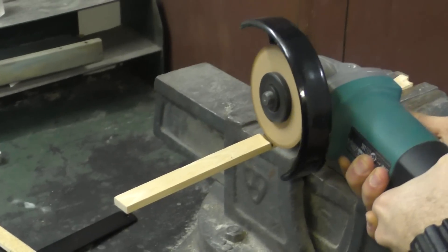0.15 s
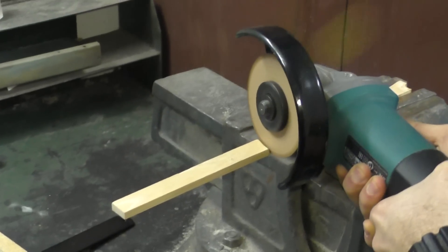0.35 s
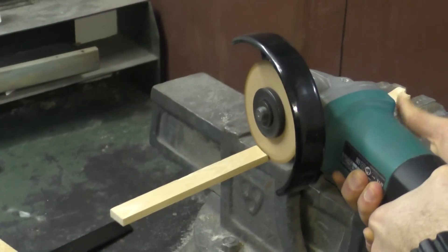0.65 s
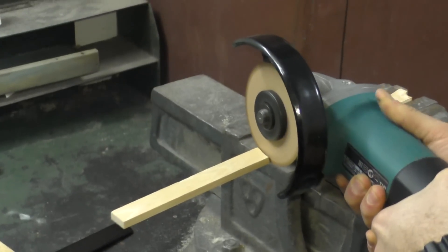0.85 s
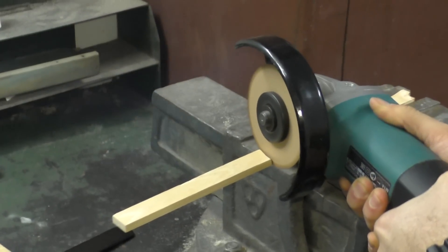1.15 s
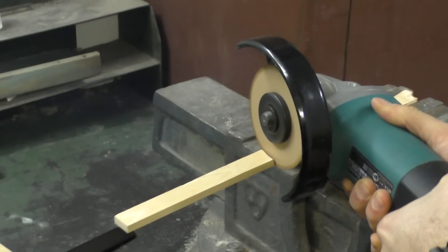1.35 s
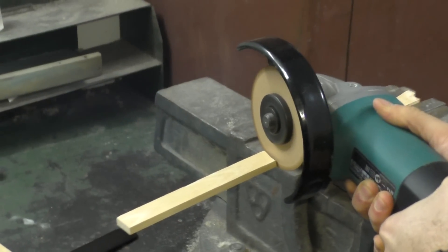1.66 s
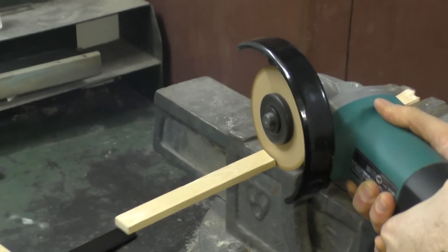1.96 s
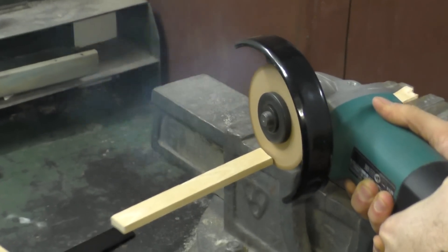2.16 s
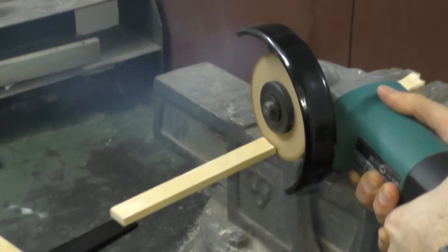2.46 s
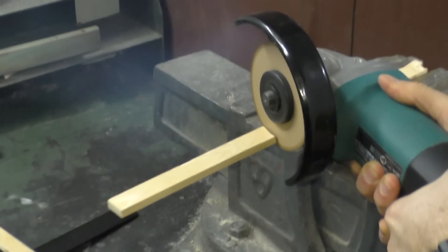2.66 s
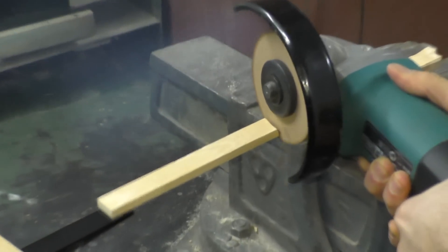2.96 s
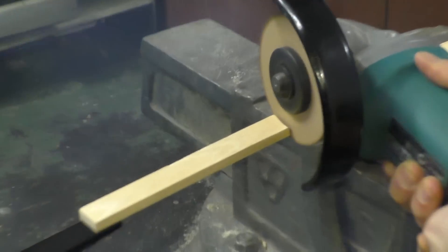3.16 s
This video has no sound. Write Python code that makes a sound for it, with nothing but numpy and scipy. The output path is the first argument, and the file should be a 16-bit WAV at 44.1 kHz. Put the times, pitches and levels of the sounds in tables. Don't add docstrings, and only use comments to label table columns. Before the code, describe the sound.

An angle grinder's cardboard disc rubs a thin wooden strip, already loud at 0 s: bright, gritty, rapidly fluttering hiss over a faint geared motor whine. The start is ragged, with slips and tears until 0.3 s and brief catches near 0.54, 1.07, 1.58 and 2.17 s. Shifting whistling tones sink in pitch until about 2.3 s, then hold. A splinter snaps at 2.97 s; grinding continues to the end. Close, stronger right, short workshop reflections.

```python
import sys
import numpy as np
from scipy import signal
from scipy.fft import rfft, irfft, next_fast_len
from scipy.io import wavfile
from scipy.ndimage import map_coordinates

SR = 44100
rng = np.random.default_rng(int(sys.argv[2]) if len(sys.argv) > 2 else 0)


def attenuation_scalar(level_db):
    decades = np.asarray(level_db, float) / 20
    return 10 ** decades


def wav_record(signal):
    frames = np.transpose(np.atleast_2d(signal))
    bounded = np.clip(frames, -1, 1)
    quanta = np.round(bounded * 32767).astype(np.int16)
    wavfile.write(sys.argv[1], SR, quanta)


N = 145530
TIME = np.arange(N) / SR


def unit(x):
    return x / np.sqrt(np.mean(x ** 2) + 1e-20)


def along(points, hz):
    f, v = np.transpose(points)
    return np.interp(np.log(hz + 1), np.log(f + 1), v)


def curve(rows):
    return np.interp(TIME, *np.transpose(rows))


def wobble(rate_hz):
    knots = rng.standard_normal(int(N * rate_hz / SR) + 4)
    return map_coordinates(knots, [TIME * rate_hz])


def during(start_s, end_s, fade_s):
    inside_s = np.minimum(TIME - start_s, end_s - TIME)
    return np.clip(inside_s / fade_s + 0.5, 0, 1)


def bell(hz, centre_hz, width_hz):
    return np.exp(-((hz - centre_hz) / width_hz) ** 2)


def filtered(x, response):
    m = next_fast_len(N + SR // 2)
    return irfft(rfft(x, m) * response(np.fft.rfftfreq(m, 1 / SR)), m)[..., :N]


# (frequency [Hz], level [dB per Hz])
SHOP_COLOUR = [(15, -20), (30, 5), (60, -3.5), (100, 2), (180, 1), (320, 5.5), (700, 1.5), (1200, -16)]


def workshop():
    noise = rng.standard_normal((3, N))
    return attenuation_scalar(-58) * unit(filtered(noise, lambda hz: attenuation_scalar(along(SHOP_COLOUR, hz))))


# (time [s], speed [turns per s])
DISC_SPEED = [(0.0, 152.4), (0.04, 153.9), (0.11, 146.5), (0.25, 147.5), (0.28, 149.7), (0.5, 149.5),
              (0.92, 139.9), (1.09, 134.3), (1.24, 132.8), (1.73, 131.3), (1.96, 133.6), (2.0, 132.8),
              (2.21, 124.2), (2.34, 121.6), (2.51, 120.9), (2.63, 122.3), (3.11, 120.9), (3.3, 125.0)]
# (multiple of motor speed [1], level [dB])
MOTOR_HUM = [(1, -60), (2, -63.5)]


def motor(turns):
    gear_ratio, free_hz, load_db_per_hz = 3.73, 137.3, 0.28
    load_db = load_db_per_hz * (free_hz - curve(DISC_SPEED))
    hum = np.zeros(N)
    for multiple, db in MOTOR_HUM:
        level = attenuation_scalar(db + 2.5 + load_db + 0.27 * wobble(5.04))
        hum += level * np.sin(2 * np.pi * multiple * gear_ratio * turns + 0.21 * wobble(9.5))
    return hum


# (time [s], level [dB])
FIBRE_SNAPS = [
    (2.965, -16),
    (2.9675, -17),
    (2.9694, -13),
    (2.973, -16),
    (2.976, -17),
]
# (frequency [Hz], level [dB])
FIBRE_COLOUR = [(1500, -70), (3000, -20), (5000, -4), (9000, 0), (15500, -5)]


def splinter():
    t60_s = 0.016
    cracks = sum((TIME >= s) * attenuation_scalar(db - 60 * np.abs(TIME - s) / t60_s) for s, db in FIBRE_SNAPS)
    noise = cracks * rng.standard_normal(N) * attenuation_scalar(3.0)
    return filtered(noise, lambda hz: attenuation_scalar(along(FIBRE_COLOUR, hz)))


# (start [s], end [s], level [dB])
SWELL_COUNTS = (1, 1, 2, 2, 5, 5, 5, 6, 6, 8, 8)
SWELL_SPANS = [(0.71, 1.12, -55.5), (1.14, 1.8, -61.5), (0.91, 2.17, -57), (2.2, 3, -64.5),
               (1.04, 2, -59.5), (1.85, 2.08, -50), (2.3, 3.3, -51), (1.3, 2.2, -60), (2, 2.8, -62),
               (1.17, 2.2, -54), (2.93, 3.4, -44.5)]
# (start [s], end [s], level [dB])
LOBE_COUNTS = (7, 8, 9, 9, 9, 10, 10, 10, 10, 11, 12, 14, 14, 15, 15, 15, 16, 16, 17, 17, 17, 18, 18, 19,
               19, 19, 20, 21, 21, 22, 22, 22, 22, 25, 25, 25)
LOBE_SPANS = [(0.11, 0.19, -44.5), (0.49, 0.57, -44.9), (0.68, 1.06, -41.4), (2.06, 2.15, -45.4),
              (2.27, 2.44, -44.7), (0.61, 1.46, -41.5), (1.56, 2.12, -43.5), (2.2, 2.29, -44.1),
              (2.62, 2.93, -42.8), (1.65, 2.96, -40.0), (0.53, 0.91, -42.1), (0.25, 0.39, -41.2),
              (0.8, 0.93, -37.0), (0.43, 0.72, -38.4), (0.82, 1.06, -38.2), (2.15, 2.27, -41.7),
              (0.27, 0.49, -39.8), (2.86, 2.96, -40.9), (0.41, 0.53, -38.7), (0.93, 1.01, -39.9),
              (1.08, 2.15, -37.7), (1.17, 1.4, -39.3), (1.49, 2.01, -39.5), (1.08, 1.58, -38.4),
              (1.81, 2.05, -35.7), (2.67, 2.81, -41.5), (0.93, 1.06, -38.3), (0.41, 1.12, -35.7),
              (1.24, 2.27, -37.3), (0.09, 0.19, -37.5), (0.55, 0.65, -38.8), (1.17, 1.4, -39.0),
              (2.27, 2.41, -39.6), (0.09, 0.17, -39.2), (0.61, 0.76, -35.8), (1.1, 1.19, -38.6)]
# (start [s], end [s], level [dB])
RIDGE_COUNTS = (26, 27, 27, 27, 27, 29, 29, 30, 30, 30, 31, 31, 32, 33, 33, 33, 33, 34, 35, 37, 37, 37, 39,
                40, 41, 42, 42, 45, 46, 50, 52, 58, 58, 59, 61, 62, 63, 64, 65, 66, 66, 67, 68, 70, 71, 71,
                75, 79, 82, 83, 88, 89)
RIDGE_SPANS = [(0.89, 1.04, -37.4), (0.07, 0.21, -30.8), (0.43, 0.68, -38.1), (1.02, 1.26, -36.0),
               (2.13, 2.24, -37.5), (0.09, 0.17, -35.5), (0.57, 1.55, -37.1), (0.59, 0.72, -35.1),
               (0.93, 1.17, -35.9), (1.31, 1.55, -36.8), (0.99, 1.35, -34.4), (2.69, 2.96, -36.6),
               (1.47, 1.81, -36.9), (0.09, 0.21, -35.7), (0.51, 0.63, -34.2), (1.02, 1.44, -35.3),
               (2.35, 2.81, -34.6), (2.17, 2.91, -34.8), (2.35, 3.25, -34.8), (0.82, 1.1, -35.2),
               (1.17, 1.6, -36.3), (2.52, 2.71, -39.3), (1.04, 1.15, -37.9), (0.45, 0.61, -38.5),
               (2.54, 2.81, -36.9), (0.47, 0.65, -39.9), (2.86, 3.11, -41.9), (0.29, 0.51, -39.9),
               (2.59, 2.96, -38.2), (2.74, 2.93, -39.5), (0.29, 0.43, -39.6), (0.39, 0.72, -40.9),
               (1.83, 2.15, -38.2), (0.49, 0.97, -40.3), (0.25, 0.57, -33.4), (0.47, 0.72, -38.4),
               (0.41, 0.57, -33.1), (0.25, 0.53, -35.9), (0.27, 0.63, -35.3), (0.25, 0.43, -32.5),
               (1.28, 1.6, -39.1), (0.29, 0.39, -35.9), (0.27, 0.49, -33.9), (0.29, 0.55, -38.3),
               (0.29, 0.45, -35.2), (1.17, 1.58, -35.6), (1.85, 2.01, -36.2), (2.57, 2.93, -38.6),
               (0.33, 0.61, -39.1), (0.78, 1.01, -40.1), (1.19, 1.46, -40.5), (2.59, 2.78, -39.9)]


def lobes(turns):
    fade_s, gain_db = 0.04, 2.5
    sway_db, drift_rad = 2.0 * wobble(16), 0.58 * wobble(9)
    counts = SWELL_COUNTS + LOBE_COUNTS + RIDGE_COUNTS
    spans = [*SWELL_SPANS, *LOBE_SPANS, *RIDGE_SPANS]
    shifts = rng.integers(N, size=len(spans))
    lines = np.zeros(N)
    for bumps, (start_s, end_s, db), shift in zip(counts, spans, shifts):
        fade = during(start_s, end_s, fade_s)
        on = np.flatnonzero(fade)
        own = (on + shift) % N
        phase = 2 * np.pi * bumps * turns[on] + drift_rad[own] + shift
        lines[on] += fade[on] * attenuation_scalar(db + gain_db + sway_db[own]) * np.sin(phase)
    return lines


# (time [s], half length [s], loose share [0-1], extra level [dB])
RIM_TEARS = [
    (0.038, 0.11, 0.68, 1.5),
    (0.225, 0.037, 0.9, -1),
    (0.285, 0.016, 1, 3.5),
    (0.544, 0.014, 0.7, 0),
    (1.07, 0.009, 0.2, 1),
    (1.577, 0.0088, 1, 2),
    (2.17, 0.083, 0.5, -0.5),
    (2.965, 0.013, 1, 1.5),
]


def torn():
    loose, extra_db = np.zeros(N), np.zeros(N)
    for s, half_s, share, db in RIM_TEARS:
        near = np.exp(-((TIME - s) / half_s) ** 4)
        loose = np.maximum(loose, share * near)
        extra_db += db * near
    return loose, extra_db


def worn_rim(turns, loose, count, size=1024):
    wear_turns, even_wear = 18, 0.4
    outline = rfft(rng.standard_normal((size // 2, size)))[:, :count + 1]
    loose_by_turn = np.interp(np.arange(size // 2), turns, loose)
    keep = np.exp(-1 / wear_turns) * np.sqrt(1 - loose_by_turn / 2)
    for k in range(1, size // 2):
        outline[k] = keep[k] * outline[k - 1] + np.sqrt(1 - keep[k] ** 2) * outline[k]
    outline = outline / (np.abs(outline) + 1e-9) ** even_wear
    place = [turns, turns % 1 * size]
    return unit(map_coordinates(irfft(outline, size), place, order=1, mode="grid-wrap"))


# (time [s], level [dB])
HAND_PRESSURE = [(0, -21.5), (.045, -19), (.09, -21), (.12, -16), (.21, -24), (.27, -18.5), (.287, -20.5),
                 (.41, -21.5), (.46, -19.5), (.7, -21), (.91, -20), (1.16, -22.5), (1.25, -22), (1.7, -22),
                 (2.02, -19), (2.55, -22), (2.8, -21), (3.3, -20.5)]
# (frequency [Hz], level [dB per Hz])
RIM_COLOUR = [(35, -66), (60, -27), (133, -43.5), (815, -18.5), (1370, -0.5), (1570, -8.5), (9610, -4.5),
              (15400, -7.5), (16500, -55)]
# (frequency [Hz], width [Hz], gain [dB])
STRIP_MODES = [(1340, 330, -4.5), (2550, 990, 5), (4130, 1100, 4), (5960, 1450, -1), (11500, 920, 2)]
# (start [s], end [s], frequency [Hz], width [Hz],
# gain [dB])
STRIP_SQUEALS = [(1.3, .14, 4500, 1200, 2.5), (0, .53, 10100, 1200, 2.5), (-1, 2.9, 9300, 940, 3),
                 (-3, 6, 4200, 480, 2.5), (0.9, 1.9, 2550, 570, 1.5), (0, 0.1, 1600, 2300, 2.5),
                 (0.9, 0.85, 4300, 1500, 0.1), (-3.5, 0.096, 320, 66, 12), (-1.1, 0.356, 430, 60, 11),
                 (-1, 0.095, 10800, 3200, -2.5), (-0.5, 0.28, 13400, 5300, -3.5),
                 (-0.2, 1.4, 16400, 2400, -1), (3, 2.5, 1500, 81, -1.5), (1.0, 1.3, 3900, 490, 2.5),
                 (1, 0.81, 4600, 570, -1), (0.55, 0.896, 2450, 170, -6.5), (1.5, 2.3, 4300, 730, -1.5),
                 (2.5, 3.7, 2470, 160, -4)]


def strip_colour(hz):
    modes_db = sum(db * bell(hz, centre_hz, width_hz) for centre_hz, width_hz, db in STRIP_MODES)
    return attenuation_scalar(along(RIM_COLOUR, hz) + modes_db)


def squealed(hiss):
    hz, t, bins = signal.stft(hiss, SR, nperseg=512, noverlap=384)
    ring_db = 0
    for start_s, end_s, centre_hz, width_hz, db in STRIP_SQUEALS:
        caught = np.interp(t, TIME, during(start_s, end_s, 0.0062))
        ring_db = ring_db + db * np.outer(bell(hz, centre_hz, width_hz), caught)
    return signal.istft(bins * attenuation_scalar(ring_db), SR, nperseg=512, noverlap=384)[1][:N]


def rubbing(turns):
    oval_db, eccentric_db, ragged_db, rim_db = 1.3, 0.5, 1.0, -2
    loose, extra_db = torn()
    share = np.maximum(loose, 0.36)
    angle = 2 * np.pi * turns
    bite_db = oval_db * np.cos(2 * angle + wobble(2.9))
    bite_db += eccentric_db * np.cos(angle + wobble(2.44))
    bite_db += ragged_db * worn_rim(turns, loose, count=24)
    repeating = np.sqrt(1 - share) * worn_rim(turns, loose, count=132)
    scrape = np.sqrt(share) * rng.standard_normal(N)
    hiss = squealed(unit(filtered((repeating + scrape) * attenuation_scalar(bite_db), strip_colour)))
    return hiss * attenuation_scalar(curve(HAND_PRESSURE) + rim_db + extra_db + 0.57 * wobble(5.84))


def near_walls(tool):
    t60_s = 0.3
    tail = rng.standard_normal(SR // 4) * attenuation_scalar(-60 * TIME[:SR // 4] / t60_s)
    return signal.fftconvolve(tool, tail / np.linalg.norm(tail))[:N]


# (frequency [Hz], likeness [0-1])
PORT_LIKENESS = [(40, .1), (100, .85), (250, .9), (640, .82), (1410, .7), (3100, .48), (5000, .4),
                 (7500, .58), (8800, 1)]
# (frequency [Hz], level [dB])
LEFT_OVER_RIGHT = [(40, 0), (110, -.5), (200, -5.5), (380, -5), (700, -7), (1400, -3.5), (2800, -3),
                   (5500, -11.5), (8300, -9), (10000, -5.5)]
# (frequency [Hz], phase [rad])
LEFT_AHEAD = [(3000, 0), (3530, -1.0), (4100, -.3), (5770, -.2), (7150, .9), (8200, .9), (8700, 0)]


def camera_ports(tool):
    def split(hz):
        mix_rad = np.arccos(np.clip(along(PORT_LIKENESS, hz), -1, 1))
        return np.array([np.cos(mix_rad), np.sin(mix_rad)])

    def ports(hz):
        half = attenuation_scalar(along(LEFT_OVER_RIGHT, hz) / 2) * np.exp(0.5j * along(LEFT_AHEAD, hz))
        return half ** np.array([[1], [-1]])

    direct, thrown = filtered(np.array([tool, near_walls(tool)]), split)
    return filtered(np.array([direct + thrown, tool]), ports)


def scene():
    turns = np.cumsum(curve(DISC_SPEED)) / SR
    shop = workshop()
    tool = shop[0] + motor(turns) + splinter() + lobes(turns) + rubbing(turns)
    return camera_ports(tool) + attenuation_scalar(-9.5) * shop[1:]


def roll_off(x):
    return signal.sosfilt(signal.butter(12, 17020, fs=SR, output="sos"), x)


def record(dry):
    top_hz = 15725
    mix = filtered(dry, lambda hz: hz < top_hz)
    return roll_off(mix)


dry = scene()
out = record(dry)
wav_record(out)
```